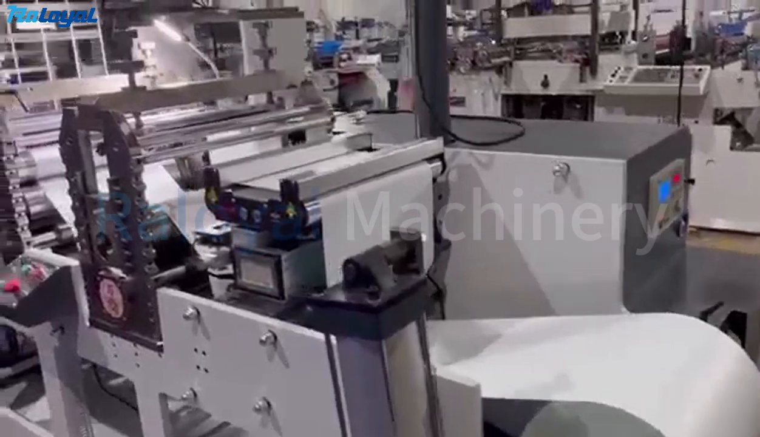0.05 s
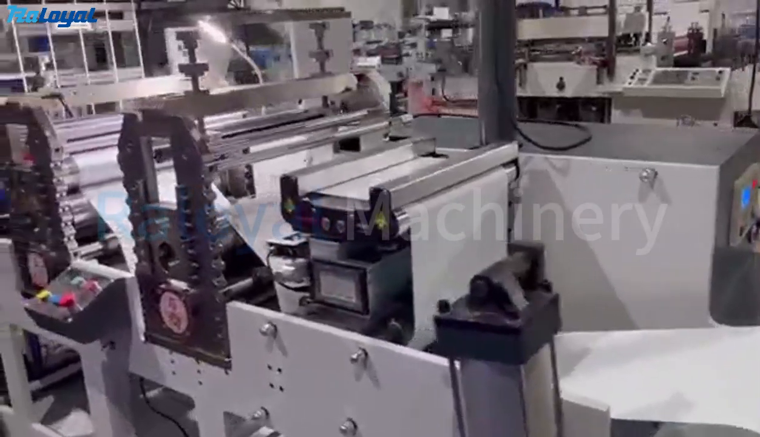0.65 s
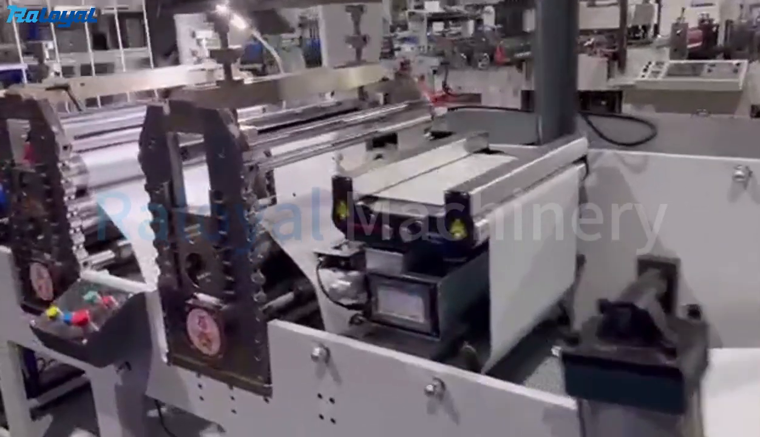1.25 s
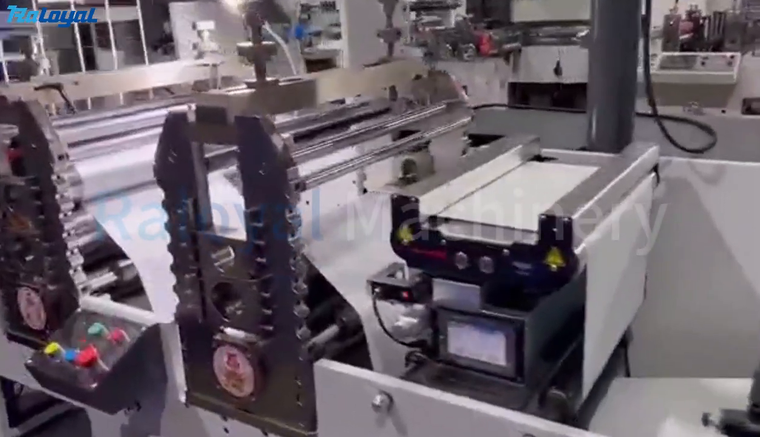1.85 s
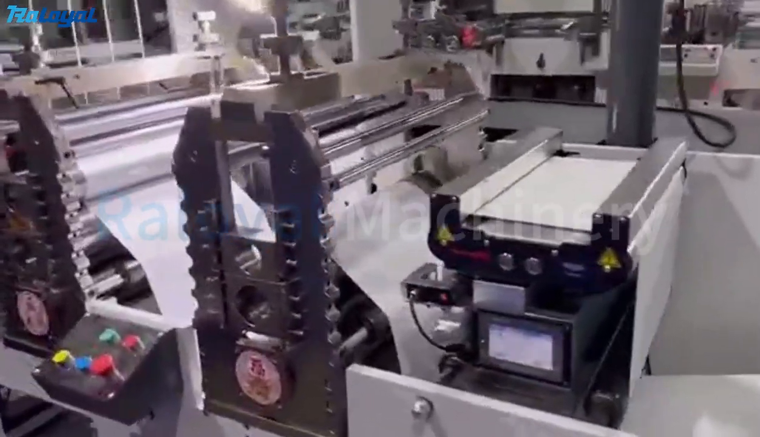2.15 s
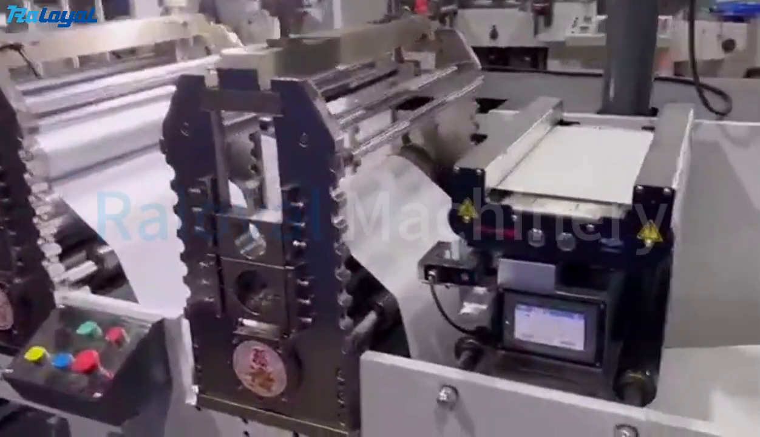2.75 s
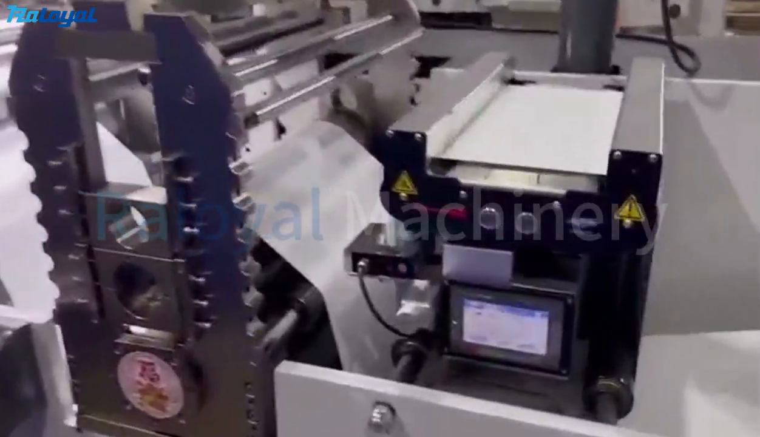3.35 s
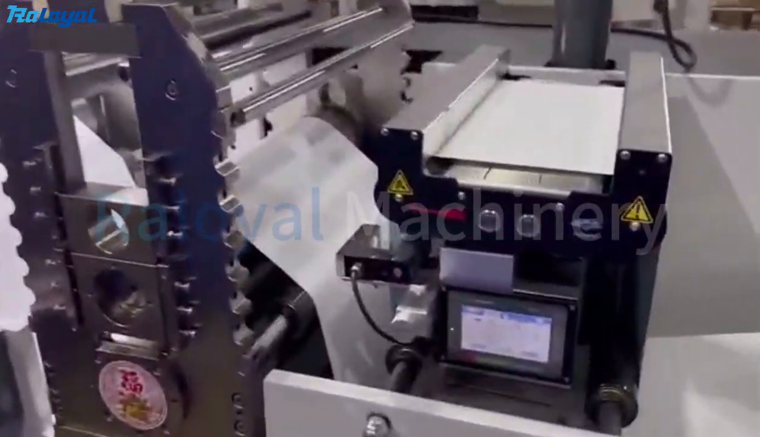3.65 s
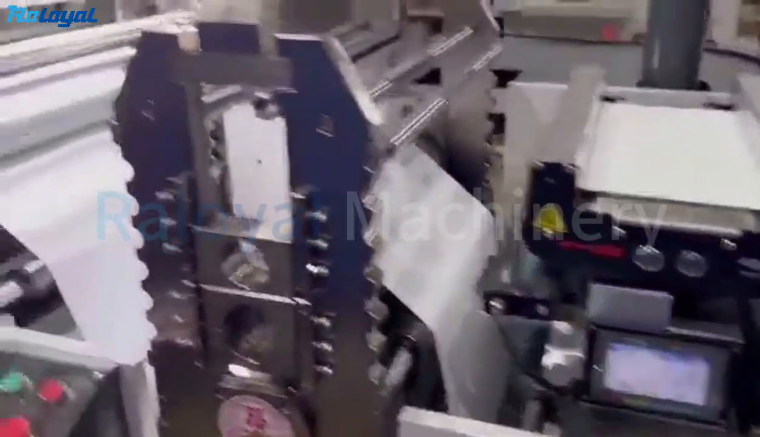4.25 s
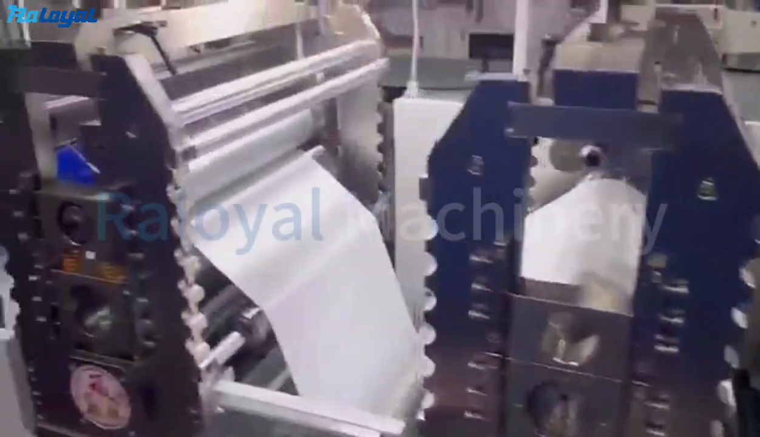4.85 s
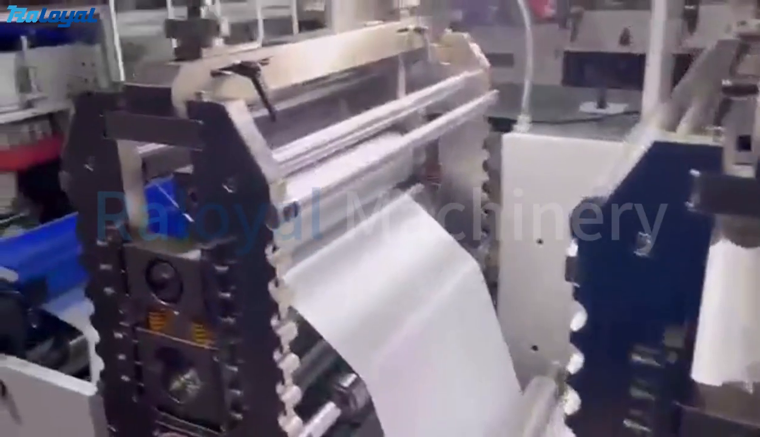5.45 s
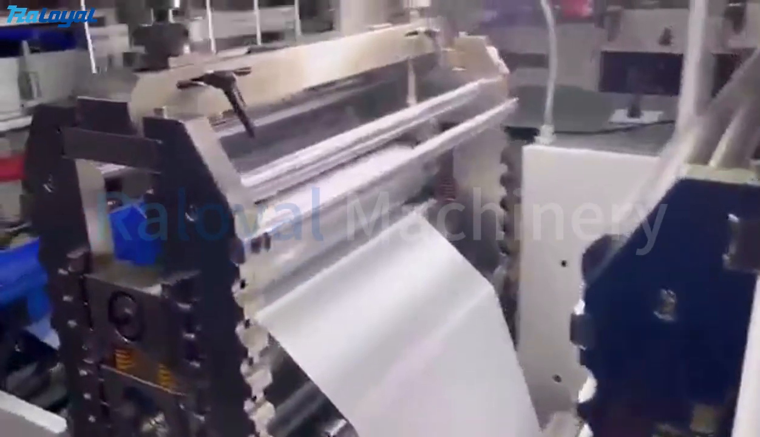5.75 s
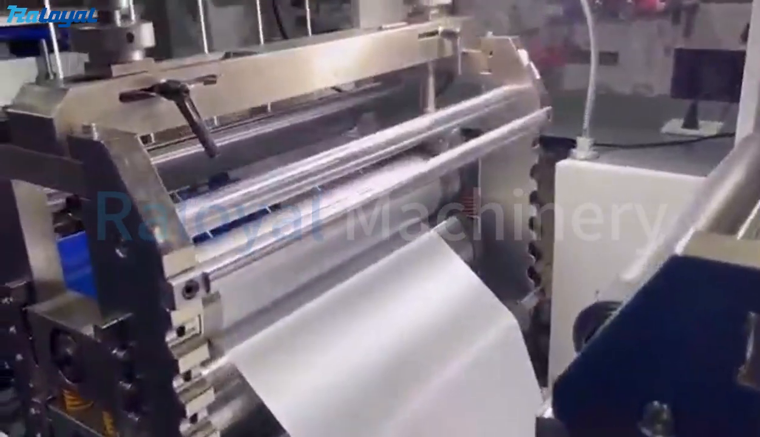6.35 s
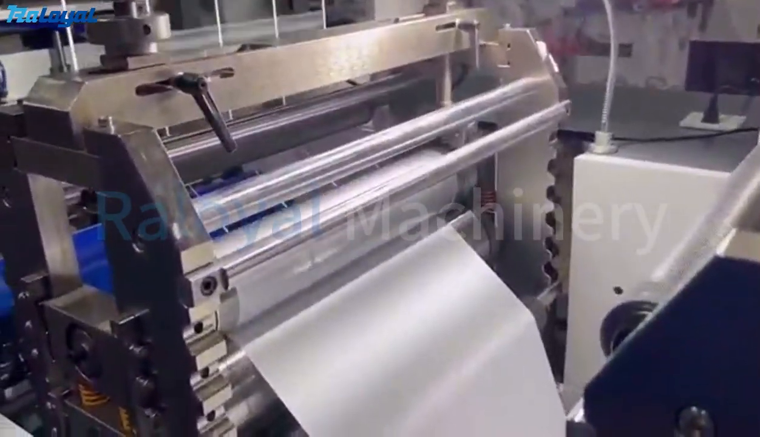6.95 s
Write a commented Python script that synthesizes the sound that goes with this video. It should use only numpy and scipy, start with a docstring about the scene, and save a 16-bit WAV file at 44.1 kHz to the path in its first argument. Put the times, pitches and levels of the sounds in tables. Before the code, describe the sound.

Rapid, regular knocking on a steel frame runs throughout, set in the roar and motor drone of a factory. The microphone moves along the machine, so its hums and ringing metal tones gently rise and fall. A chain chatters, small parts tinkle and running paper hisses. Around the middle a loose cover bumps once amid short paper rasps, and a few brighter clinks come near the end.

```python
"""The roar and motor hum of a factory hall, and a steady knocking, about 11 times a second.
The microphone is carried along a web converting machine. With each turn of the main shaft a cam
knocks the steel frame and the gears repeat their churn. Sheet-metal guards and one roller sing,
a drive chain rattles and slaps in step with the shaft, and loose parts tinkle and clink.
The running paper web hisses, rustles and scuffs over the rollers; midway a loose cover bumps once."""
import sys
import numpy as np
from scipy import signal
from scipy.fft import rfft, irfft, next_fast_len
from scipy.io import wavfile
from scipy.ndimage import uniform_filter1d, map_coordinates

SR = 44100
rng = np.random.default_rng(int(sys.argv[2]) if len(sys.argv) > 2 else 0)


def inscribe(sig):
    """Save sig as 16-bit PCM at rate SR to the path in sys.argv[1].

    A 1-D sig is mono; a 2-D sig holds one channel per row.
    Samples are clipped to [-1, 1] before scaling.
    """
    pcm = np.round(np.clip(np.atleast_2d(sig).T, -1, 1) * 32767)
    wavfile.write(sys.argv[1], SR, pcm.astype(np.int16))


N = 317520
TURN_HZ, FIRST_KNOCK_S = 10.9348, 0.037  # the main shaft's beat

# roar of the hall, all around: (frequency [Hz], level [dB])
HALL_SPECTRUM = [(20, -18), (45, -12), (80, -11.5), (140, -3.5), (230, -1), (430, -2.5), (700, -0.5),
                 (1250, -3.5), (1550, -8), (2100, -10.5), (2600, -18.5), (3300, -25), (6000, -43)]
# rumble of the rollers along the walk: (time [s], level [dB])
RUMBLE_LEVEL = [(0.06, -27), (1.5, -27), (2.4, -29), (3.4, -24), (4.2, -28), (5.2, -29.5), (6.1, -27.5),
                (7.2, -29.5)]
# the singing roller: (frequency [Hz], width [Hz], level [dB])
ROLLER_MODE = [(1636, 19, 0)]
# that roller at the microphone: (time [s], level [dB])
ROLLER_LEVEL = [(0, -38), (0.4, -37.5), (1.0, -42), (1.75, -37), (2.3, -54), (3.1, -45), (3.7, -36),
                (4.5, -36.5), (5.5, -40), (6.1, -38), (7, -40)]
# hiss of the web: (frequency [Hz], level [dB])
HISS_SPECTRUM = [(1500, -7), (3200, -0.5), (4800, -1), (5700, -6), (6400, 0.5), (8300, -1), (11500, -14.5),
                 (14000, -1)]
# mains and motor tones: (frequency [Hz], level [dB])
HUM_TONES = [(50, -43), (69.3, -49), (100, -50.5), (200, -42), (357, -36.5), (400.7, -46), (615.3, -53),
             (650.7, -45), (716, -42.5), (8319, -70)]
# motor drones that swell along the walk:
# (frequency [Hz], level [dB], fade [dB/s], crest time [s], period [s], swing [dB])
DRONE_SWELLS = [(106.8, -51.5, -1.5, 4.8, 8.2, 5), (213.2, -32.5, 2, 0.69, 2.2, 2),
                (250.2, -28.5, 2, 1.5, 2, 2.5), (290.6, -33, 0, 3.9, 4.9, 2),
                (524, -40.5, 0, 3.85, 5.2, 7.5), (631.3, -42, -2, 3.5, 5.1, 3)]
# the main motor drone at the microphone: (time [s], level [dB])
MAIN_DRONE_LEVEL = [(0.05, -38), (0.45, -30), (1.3, -44), (1.7, -32), (2.7, -45), (3.05, -30.5),
                    (3.65, -32), (3.95, -39), (5.3, -36.5), (6, -32.5), (6.55, -31.5), (7.2, -40)]
# two sheet-metal guards: (frequency [Hz], width [Hz], level [dB])
GUARD_MODES = [(976, 54, -3), (1047.6, 21, -2.5)]
# the guards at the microphone: (time [s], level [dB])
GUARD_LEVEL = [(0.3, -26.5), (1.1, -31.5), (1.6, -29), (2.4, -31), (3.2, -31.5), (3.8, -34.5),
               (4.17, -29.5), (4.7, -28), (5.4, -33.5), (6.2, -29.5), (7.1, -34)]
# churn of the gears: (frequency [Hz], level [dB])
CHURN_SPECTRUM = [(40, -25), (90, -6), (200, -4), (400, 2.5), (600, -1.5), (720, 0.5), (900, 4),
                  (1050, -10), (1250, 3.5), (1500, -3.5), (2200, -11), (2800, -38), (6000, -45)]
# strong orders of the shaft: (multiple of the turn rate, level [dB])
SHAFT_ORDERS = [(10, -45.5), (13, -42), (16, -41.5), (18, -44.5), (24, -54), (26, -42.5), (28, -52),
                (32, -42), (34, -54), (40, -45), (42, -55), (43, -51.5), (48, -42)]
# gearbox rumble along the walk: (level [dB], fade [dB/s], crest time [s], period [s], swing [dB])
GEARBOX_SWELL = (-44, -0.1, 7, 5.5, 2.5)
# chain links: (frequency [Hz], width [Hz], level [dB])
LINK_MODES = [(4460, 1900, 2), (7400, 4900, 3.5), (12440, 350, 7), (13300, 120, 13)]
# beats that tighten the chain: (rate [Hz], peak time [s])
TENSION_BEATS = [(3.32, .104), (7.59, .094), (10.935, .041), (21.87, .013)]
# how far each beat moves the chatter: (swing [dB])
TENSION_SWINGS = [1.1, 2.5, 2.4, 2.2]
# paper running over the rollers: (frequency [Hz], width [Hz], level [dB])
PAPER_MODES = [(2700, 460, -2.5), (3630, 390, 2), (4500, 800, -0.5), (5600, 300, -3.5), (6330, 400, -8.5)]
# its rustle at the microphone: (time [s], level [dB])
RUSTLE_LEVEL = [(0.1, -44.5), (0.8, -47), (1.7, -47), (2.1, -48), (2.6, -43.5), (3.4, -53), (4.6, -46),
                (5.65, -57), (6, -45), (6.6, -46.5), (7.2, -49)]
# the steel frame: (frequency [Hz], level [dB], t60 [s])
FRAME_MODES = [(738, -18, 0.04), (859, -3, 0.039), (850.6, -17.5, 0.31), (950, -40, 0.069)]
# the cam touches the frame, then lands fully: (delay [s], level [dB])
CAM_CONTACTS = [(0, -3), (.008, 0)]
# the shaft runs unevenly, so the knock comes late or early: (time [s], delay [s])
KNOCK_DELAY = [(0, .008), (.7, .003), (2.2, .001), (4.2, -.001), (5.5, -.003), (6.6, 0)]
# the knock, weaker once the microphone has passed the frame: (time [s], level [dB])
KNOCK_LEVEL = [(0.05, -13), (0.5, -15), (0.9, -17.5), (1.38, -11.5), (1.9, -16), (2.4, -13.5), (3.1, -14.5),
               (3.65, -12.5), (4.25, -14), (4.95, -19), (5.7, -19), (6.0, -18), (6.5, -16.5), (7.1, -17.5)]
# the cam's contact: (frequency [Hz], level [dB])
CLACK_SPECTRUM = [(400, -28), (620, 1), (740, 3), (860, -4.5), (1080, 2.5), (1400, -10.5), (2100, -9),
                  (3500, -34), (9000, -53)]
# blows on a loose steel part: (time [s], ring [dB], crackle [dB], brightest frequency [Hz])
CLINK_BLOWS = [(0.105, -40, -27, 4000), (0.381, -28, -21, 3850), (0.396, -31, -23, 4000),
               (0.637, -32, -34, 4400), (1.659, -39, -29, 2900), (1.885, -27, -21, 3500),
               (1.891, -28, -19.5, 4420), (2.334, -35, -28, 4200), (2.576, -37, -27, 4400),
               (4.955, -37, -26, 4200), (6.175, -27, -19, 3100), (6.179, -23, -30, 4850),
               (6.479, -29, -18.5, 5200)]
# that steel part: (frequency [Hz], level [dB], t60 [s])
STEEL_MODES = [(2428, 5, 0.054), (2740, 1, .06), (2960, 4, .07), (3160, -6, .1), (3560, -1.5, .06),
               (3830, -1.5, .06), (4140, -2, .07), (4420, -1, .06), (4790, -4.5, 0.12), (4920, 0, .05),
               (5109, -6, .04), (5530, -11, .07), (6300, -2, .07), (7300, -3, .05)]
# crackle of clinks and slaps: (frequency [Hz], level [dB])
CRACKLE_SPECTRUM = [(1200, -33), (2500, 11), (4400, 12.5), (5800, 12), (8300, 10.5), (14000, 5.5)]
# hard slaps of the chain: (turn number, crackle [dB], ring [dB])
CHAIN_SLAPS = [(4, -20, -28), (7, -22, -48), (8, -21, -38), (11, -23, -48), (18, -24, -34), (20, -22, -37),
               (28, -18, -32), (31, -20, -41), (34, -22, -37), (38, -23, -28), (41, -21, -33),
               (43, -19, -33), (44, -20, -29), (51, -20, -36), (54, -20, -31), (59, -25, -36),
               (63, -25, -36), (64, -25, -37), (67, -20, -28), (74, -20, -34), (76, -23, -33)]
# scuffs of the web: (time [s], half length [s], frequency [Hz], width [Hz], level [dB])
WEB_SCUFFS = [(1.68, 0.02, 1900, 600, -34), (1.854, .01, 2050, 800, -29.5), (1.873, .005, 1900, 500, -28),
              (3.294, 0.014, 1800, 700, -29), (3.284, .014, 3400, 900, -39), (3.78, 0.033, 2590, 90, -39),
              (3.97, 0.047, 2400, 500, -41), (4.09, .04, 1900, 900, -37), (4.11, 0.032, 2700, 140, -34.5),
              (4.244, 0.0078, 2100, 350, -33), (4.293, 0.039, 2600, 110, -38),
              (4.344, 0.013, 3660, 100, -38), (4.365, 0.061, 2800, 350, -39), (4.36, .02, 1980, 400, -35),
              (4.435, .007, 2090, 400, -34), (6.06, 0.076, 2400, 600, -36), (6.425, .06, 2300, 600, -36.5)]
# the loose cover: (frequency [Hz], width [Hz], level [dB])
COVER_MODES = [(640, 130, 5), (1350, 350, -0.5), (2150, 450, -10), (2550, 200, -5)]
# a deep treble dip over the whole sound: (frequency [Hz], gain [dB])
TREBLE_DIP = [(8500, 0), (9100, -8), (9600, -56), (10400, -27), (11000, 0), (11900, 4), (13800, -2),
              (14300, -19)]


def amp(db):
    """Decibels to gain."""
    return 10 ** (np.asarray(db) / 20)


def unit(x):
    """Scale to rms 1."""
    return x / np.sqrt(np.mean(x ** 2) + 1e-20)


def clock():
    """Time of each sample."""
    return np.arange(N) / SR


def curve(rows):
    """One value per sample from (time, value) rows."""
    return np.interp(clock(), *np.transpose(rows))


def wobble(rate):
    """A smooth random curve, rate knots a second."""
    knots = rng.standard_normal(int(N * rate / SR) + 4)
    return map_coordinates(knots, [clock() * rate], mode="nearest")


def colour(points):
    """Gain against frequency from (Hz, dB) points on a log axis."""
    f, db = np.transpose(points)
    return lambda hz: amp(np.interp(np.log(hz + 1), np.log(f), db))


def resonant(peaks):
    """Response of (Hz, width, dB) resonances, alternating in sign."""
    return lambda f: sum((-1) ** k * amp(db) * 1j * f * width / (hz * hz - f * f + 1j * f * width)
                         for k, (hz, width, db) in enumerate(peaks))


def filtered(x, response):
    """x through a response of frequency."""
    size = next_fast_len(len(x) + SR // 4)
    return irfft(rfft(x, size) * response(np.fft.rfftfreq(size, 1 / SR)), size)[:len(x)]


def noise(response, patchy_db=3.0):
    """Coloured noise of rms 1, with small patches that come and go."""
    spectra = signal.stft(rng.standard_normal(N), nperseg=1024)[2]
    patches = uniform_filter1d(rng.standard_normal(spectra.shape), size=4, axis=0)
    patches = uniform_filter1d(patches, size=6, axis=1)
    patchy = signal.istft(spectra * amp(patchy_db * unit(patches)), nperseg=1024)[1][:N]
    return unit(filtered(patchy, response))


def grains(response, rate):
    """Tiny contacts of random size, rate a second, ringing a response; rms 1."""
    return unit(filtered(rng.standard_normal(N) * (rng.random(N) < rate / SR), response))


def each_turn(response):
    """A rough pattern that comes back with every turn of the shaft, rms 1."""
    size = round(SR / TURN_HZ)
    hz = np.fft.rfftfreq(size, 1 / SR)
    one_turn = irfft(response(hz) * np.exp(2j * np.pi * rng.random(len(hz))), size)
    return unit(np.resize(one_turn, N))


def tone(hz, waver_db=3.2, drift_rad=1.13):
    """A motor tone of rms 1, unsettled by the standing waves of the hall."""
    depth = hz / (hz + 200)  # long waves change less along the walk
    phase = 2 * np.pi * (hz * clock() + rng.random()) + drift_rad * depth * wobble(4)
    return unit(amp(waver_db * depth * wobble(5)) * np.sin(phase))


def swell(db, fade_db_per_s, crest_s, period_s, swing_db):
    """Gain as the microphone nears or leaves a source and crosses its standing wave."""
    t = clock()
    return amp(db - fade_db_per_s * t + swing_db * np.cos(2 * np.pi * (t - crest_s) / period_s))


def burst(s, rise=0.0053, t60=0.059, tail_db=-11, tail_t60=0.23):
    """Envelope of a short clump of contacts, with a faint tail from the hall."""
    age = np.maximum(clock() - s + rise / 2, 0)
    return (1 - np.exp(-age / rise)) * (amp(-60 * age / t60) + amp(tail_db - 60 * age / tail_t60))


def since_knock():
    """Time since the cam last met the frame."""
    return (clock() - FIRST_KNOCK_S - curve(KNOCK_DELAY)) % (1 / TURN_HZ)


def hall(roar_db=-26.5, fade_db_per_s=0.48, split_hz=520, flutter_db=0.1):
    """Rollers rumble below the roar of other machines, which eases along the walk."""
    spectrum = colour(HALL_SPECTRUM)
    bass = lambda hz: 1 / np.sqrt(1 + (hz / split_hz) ** 6)
    rumble = amp(curve(RUMBLE_LEVEL)) * noise(lambda hz: spectrum(hz) * bass(hz), patchy_db=1.9)
    roar_gain = amp(roar_db - fade_db_per_s * clock() + flutter_db * wobble(14))
    return rumble + roar_gain * noise(lambda hz: spectrum(hz) * np.sqrt(1 - bass(hz) ** 2))


def roller():
    """One roller sings in a narrow resonance."""
    return amp(curve(ROLLER_LEVEL)) * noise(resonant(ROLLER_MODE))


def web_hiss(level_db=-39):
    """The running web hisses evenly all along the machine."""
    return amp(level_db) * noise(colour(HISS_SPECTRUM))


def motors(drone_db=-4.0, main_hz=154.7, main_db=-1.5):
    """Mains and motors hum; the drones swell and sink as the microphone passes."""
    hum = sum(amp(db) * tone(hz) for hz, db in HUM_TONES)
    drones = sum(amp(drone_db) * swell(*wave) * tone(hz) for hz, *wave in DRONE_SWELLS)
    main = amp(curve(MAIN_DRONE_LEVEL) + main_db) * tone(main_hz, waver_db=6.0)
    return hum + drones + main


def guards(blur=1.26):
    """Shaken by the motors, two sheet-metal guards sing without pause, each a blurred note."""
    song = 0
    for hz, width, db in GUARD_MODES:
        note = tone(hz, waver_db=2.5)
        shiver = noise(resonant([(hz, width, 0)]), patchy_db=2.5)
        song += amp(db) * unit(note + blur * shiver)
    return amp(curve(GUARD_LEVEL)) * song


def gears(churn_db=-31.0, order_db=1.0, waver_db=1.0):
    """The gear train repeats every turn; its pattern shifts slowly as the microphone moves."""
    t, spectrum = clock(), colour(CHURN_SPECTRUM)
    blend = np.pi / 2 * t / t[-1]
    churn = np.cos(blend) * each_turn(spectrum) + np.sin(blend) * each_turn(spectrum)
    tones = 0
    for order, db in SHAFT_ORDERS:
        phase = 2 * np.pi * (order * TURN_HZ * t + rng.random()) + 0.17 * wobble(1.39)
        tones += amp(db + order_db) * unit(amp(waver_db * wobble(1.33)) * np.sin(phase))
    return amp(churn_db) * churn + tones


def gearbox(waver_db=1.0, centre_hz=82, width_hz=40):
    """The gearbox gives a low, hollow, uneven rumble."""
    hollow = resonant([(centre_hz, width_hz, 0)])
    return swell(*GEARBOX_SWELL) * amp(-waver_db * wobble(2.65)) * noise(lambda hz: hollow(hz) ** 2)


def chain(level_db=-44.5, scatter_db=2.2):
    """Links chatter hardest where the beats of shaft and sprocket meet."""
    tension_db = sum(db * np.cos(2 * np.pi * rate * (clock() - s))
                     for (rate, s), db in zip(TENSION_BEATS, TENSION_SWINGS))
    return amp(level_db + tension_db + scatter_db * wobble(45)) * grains(resonant(LINK_MODES), rate=7000)


def clatter(level_db=-38.5, rate=420, low_hz=1450, high_hz=6500, tilt_db_per_octave=-5.0,
            spread_db=4, t60=0.13, rise=0.0022):
    """Small loose parts ping at random all over the machine, each with its own pitch and strength."""
    t = np.arange(SR // 10) / SR
    start, pitch, phase = rng.random((int(rate * N / SR), 3)).T[..., None]
    octaves = pitch * np.log2(high_hz / low_hz)
    db = tilt_db_per_octave * octaves + spread_db * np.clip(rng.standard_normal(pitch.shape), -2, 2)
    envelopes = amp(db - 60 * t / t60) * (1 - np.exp(-t / rise))
    pings = envelopes * np.sin(2 * np.pi * (low_hz * 2 ** octaves * t + phase))
    at = (start * N).astype(int) + np.arange(len(t))
    return amp(level_db) * unit(np.bincount(at.ravel(), pings.ravel(), N)[:N])


def rustle(flutter_db=1.5):
    """The running paper crinkles finely and without pause."""
    return amp(curve(RUSTLE_LEVEL) + flutter_db * wobble(20)) * grains(resonant(PAPER_MODES), rate=2200)


def knock(level_db=2.0, push_s=0.0041, rise=0.0018, scatter_db=0.3, limp_db=0.53,
          echo_db=-16.0, echo_t60=0.6, echo_width_hz=40):
    """Once a turn a cam pushes the frame in two quick contacts, harder every other turn; it rings."""
    t = np.arange(SR // 4) / SR
    ring = 0
    for delay, contact_db in CAM_CONTACTS:
        age = np.maximum(t - delay, 0)
        released = np.maximum(age - push_s, 0)
        modes = sum(amp(db - 60 * released / t60) * np.sin(2 * np.pi * hz * t)
                    for hz, db, t60 in FRAME_MODES)
        ring += amp(contact_db) * (1 - np.exp(-age / rise)) * modes
    times = np.arange(FIRST_KNOCK_S, N / SR, 1 / TURN_HZ)
    times += np.interp(times, *np.transpose(KNOCK_DELAY))
    blow_db = scatter_db * rng.standard_normal(len(times)) + limp_db * (-1) ** np.arange(len(times))
    blows = np.zeros(N)
    blows[(times * SR).astype(int)] = amp(blow_db)
    direct = amp(level_db) * signal.fftconvolve(blows, ring)[:N]
    # the hall returns the frame's main note, blurred anew each time
    since, main_hz = since_knock(), FRAME_MODES[1][0]
    echo_gain = amp(echo_db - 60 * since / echo_t60) * (1 - np.exp(-since / push_s))
    echo = echo_gain * noise(resonant([(main_hz, echo_width_hz, 0)]))
    return amp(curve(KNOCK_LEVEL)) * (direct + echo)


def clack(level_db=-21.0, rise=0.0042, t60=0.12, fresh=0.7, grow_db_per_s=0.32):
    """The cam lands with a broad clack, partly alike every turn, partly new; it grows along the walk."""
    since, spectrum = since_knock(), colour(CLACK_SPECTRUM)
    contact = unit(each_turn(spectrum) + fresh * noise(spectrum))
    envelope = amp(-60 * since / t60) * (1 - np.exp(-since / rise))
    return amp(level_db + grow_db_per_s * clock()) * envelope * contact


def clinks(crackle_db=-8.5, rise=0.0011, focus_db_per_octave=22, scatter_db=3.0):
    """A loose steel part crackles and rings; where it is struck decides which modes speak."""
    out, t = np.zeros(N), np.arange(SR // 5) / SR
    crackle = grains(colour(CRACKLE_SPECTRUM), rate=4800)
    for s, ring_db, contact_db, bright_hz in CLINK_BLOWS:
        ring = 0
        for hz, db, t60 in STEEL_MODES:
            db -= focus_db_per_octave * abs(np.log2(hz / bright_hz)) + scatter_db * rng.standard_normal()
            ring += amp(db - 60 * t / t60) * np.sin(2 * np.pi * (hz * t + rng.random()))
        out[round(s * SR):][:len(t)] += amp(ring_db) * ring * (1 - np.exp(-t / rise))
        out += amp(contact_db + crackle_db) * burst(s) * crackle
    return out


def slaps(crackle_db=-6.5, ring_db=-1.0, lead_s=0.028):
    """On some turns the chain slaps just before the knock: a clump of crackles, and the links ring."""
    crackle_gain, ring_gain = np.zeros(N), np.zeros(N)
    for turn, db, link_db in CHAIN_SLAPS:
        shape = burst(FIRST_KNOCK_S + turn / TURN_HZ - lead_s)
        crackle_gain += amp(db + crackle_db) * shape
        ring_gain += amp(link_db + ring_db) * shape
    crackle = crackle_gain * grains(colour(CRACKLE_SPECTRUM), rate=11000)
    return crackle + ring_gain * grains(resonant(LINK_MODES[2:]), rate=3400)


def scuffs(catch_db=1.0, catch_rate=140):
    """The web catches and slips on the rollers in short rasps; the narrow ones nearly squeak."""
    catches = unit(amp(catch_db * wobble(catch_rate)))
    rasps = 0
    for s, half_s, hz, width, db in WEB_SCUFFS:
        envelope = amp(db) * np.exp(-.5 * ((clock() - s) / half_s) ** 2)
        rasps += envelope * grains(resonant([(hz, width, 0)]), rate=4000)
    return catches * rasps


def bump(at_s=4.061, level_db=-16):
    """A loose cover is jolted once: a dull knock with no ring."""
    return amp(level_db) * burst(at_s, rise=0.002, t60=0.046) * grains(resonant(COVER_MODES), rate=3400)


def scene():
    """The machine and the hall around it, at one moving microphone."""
    drive = knock() + clack() + gears() + motors() + guards() + gearbox() + chain() + slaps()
    bed = hall() + roller() + web_hiss()
    return (drive + bed + clatter() + rustle() + scuffs() + clinks() + bump())[None]


def record(dry, start_s=0.035, fade_s=0.002, top_hz=14500):
    """The sound comes in after a moment, with a deep dip in the treble and nothing above top_hz."""
    fade_in = np.clip((clock() - start_s) / fade_s, 0, 1)
    return filtered(dry[0] * fade_in, lambda hz: colour(TREBLE_DIP)(hz) * (hz < top_hz))[None]


dry = scene()
out = record(dry)
inscribe(out)
```